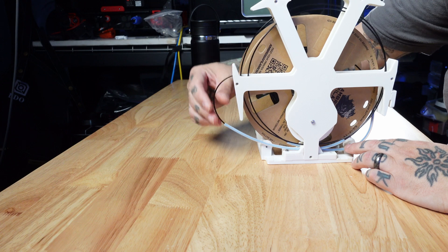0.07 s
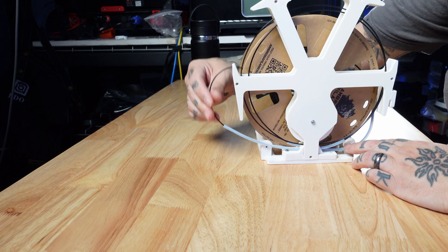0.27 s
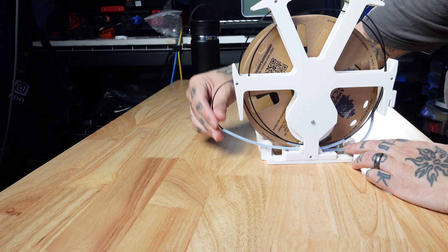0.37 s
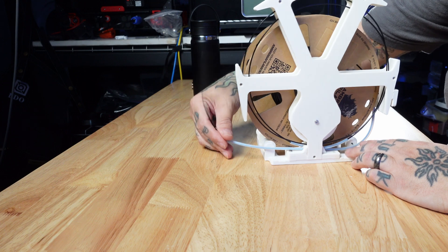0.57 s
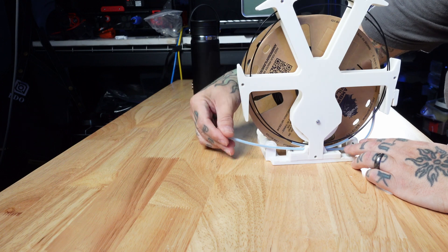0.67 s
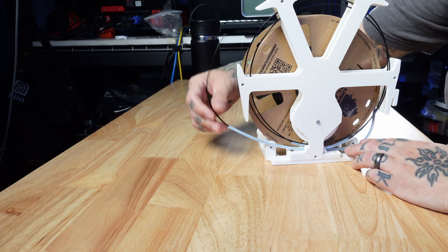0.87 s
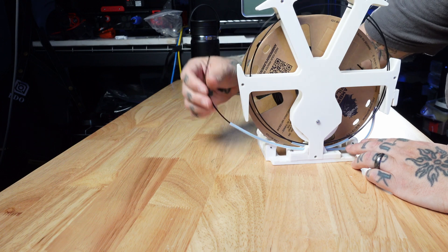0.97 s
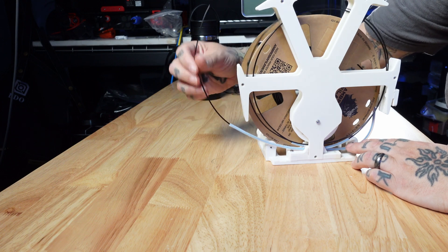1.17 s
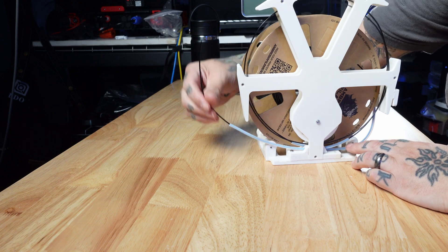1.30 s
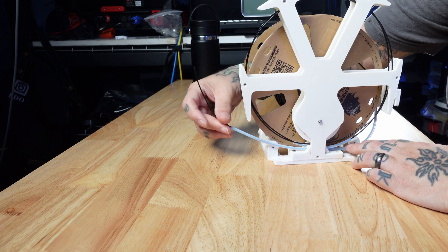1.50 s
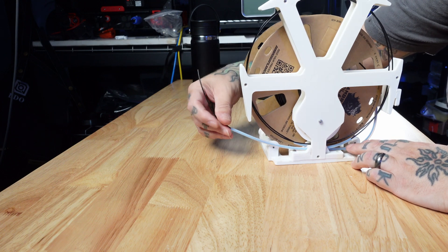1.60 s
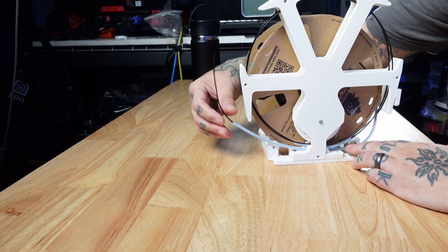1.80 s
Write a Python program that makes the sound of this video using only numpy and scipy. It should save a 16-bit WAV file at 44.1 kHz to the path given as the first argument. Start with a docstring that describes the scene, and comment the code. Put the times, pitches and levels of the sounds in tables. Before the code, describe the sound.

Close, raspy zips of stiff filament sliding in a tube, with a quick snap, tiny ticks and two soft low hums from the holder, fading to near silence over faint room rumble.

```python
"""In a quiet workshop, plastic filament is pushed by hand through a tube on a holder on a wooden bench.
Strokes of dense, tiny slips ring the tube and holder, with broad rubbing noise and treble fizz.
Snags make short bright noise bursts, a click adds a crack and dying tones, and small taps ring.
The holder hums low twice, as three gliding or steady tones over a dull rattle.
The nearby sounds get a short noise tail; steady filtered noise is the workshop rumble."""
import sys
import numpy as np
from scipy import signal
from scipy.fft import rfft, irfft
from scipy.io import wavfile
from scipy.ndimage import uniform_filter1d

SR = 44100
rng = np.random.default_rng(int(sys.argv[2]) if len(sys.argv) > 2 else 0)


def transcribe(signal):
    """Save signal, clipped to [-1, 1], as a 16-bit WAV file at the path in sys.argv[1]."""
    frames = np.atleast_2d(signal).T
    limited = np.clip(frames, -1, 1)
    pcm = np.round(limited * 32767).astype(np.int16)
    wavfile.write(sys.argv[1], SR, pcm)


N = 81585  # length in samples

# Ringing tones of the tube: f/Hz, width/Hz, relative level/dB
TUBE_MODES = [(1908, 84, 3.5), (2177.5, 90, 10.5), (2349, 11.7, 2), (3079, 65, 6.5), (3243, 12, 1.5),
              (3493, 11, -2), (3400, 35, -28), (4034, 52, 4), (4480, 18, -11), (4747, 47, 4)]
# Higher ringing tones of the tube: f/Hz, width/Hz, relative level/dB
HIGH_TUBE_MODES = [(6260, 21, -5.5), (6660, 59, -10.5), (7120, 32, -1.5), (7580, 60, -3.5), (8010, 18, -2),
                   (9140, 32, -9.5)]


def slips():
    """Tiny sticks and releases make a dense random train of impulses, uneven in size and sign."""
    slips_per_s, spread_db, flutter_db = 5000, 3, 1.5
    unevenness = np.minimum(rng.exponential(1, N), 5)
    size = amp(spread_db * unevenness) * rng.choice([-1., 1.], N)
    happens = rng.random(N) < slips_per_s / SR
    return size * happens * amp(flutter_db * slow_noise(300))


def slide():
    """Slips ring the tube, rub broadly, fizz in the treble and ring the holder lower down."""
    # Hand strokes: t/s, slide level/dB, treble relative to it/dB, low ring relative to it/dB
    strokes = [
        [(0.0, -48, -7, 8), (0.008, -49.5, -11.5, -19), (0.03, -43.5, -7, -8.5), (0.04, -44, -16, -13),
         (0.094, -58, -15, -7), (0.118, -54, -18, -2), (0.146, -43.5, -6, -8.5), (0.202, -47, -8, -13),
         (0.216, -60, -13, 6), (0.228, -62, -7, -17)],
        [(0.258, -38, -8, -13), (0.27, -46.5, -24, -16), (0.278, -45, -16.5, -13), (0.336, -41.5, -3.5, -11.5),
         (0.358, -42.5, -7, -7.5), (0.434, -47, -4.5, -4.5), (0.482, -36, -11, -9.5), (0.492, -40.5, -9, -6.5),
         (0.512, -56, -17, -0.5), (0.53, -45, -3, -5)],
        [(0.556, -48, -10, -6), (0.584, -62, 3, 11), (0.622, -53.5, -0.5, 1.5), (0.628, -59, -5, 4),
         (0.64, -58, -4, 3), (0.7, -76.5, -9, 1)],
        [(0.78, -75.5, -7, 14), (0.796, -64, -8, -12), (0.814, -64.5, -14, 8), (0.822, -55, -15, -2.5),
         (0.84, -63.5, -13, 1), (0.85, -68, -22, -8), (0.876, -103, -6, 2), (0.9, -95, -4, 11)],
        [(0.992, -67, -8, -11), (1.004, -47, -3.5, -4), (1.024, -43, -2.5, -6.5), (1.072, -37, -12, -15),
         (1.082, -37, -4, -12.5), (1.128, -42.5, -11, -7), (1.184, -49.5, -16, -9.5), (1.19, -64, 0, -3)],
        [(1.196, -44, -8, -6.5), (1.232, -39.5, -7, -17.5), (1.266, -39.5, -5.5, -8), (1.292, -33, -0.5, -7.5),
         (1.37, -37, -6, -13.5), (1.38, -45, 7, 1), (1.426, -37.5, -10, -9.5), (1.448, -49.5, -3, 0.5),
         (1.612, -78, 6, -6), (1.62, -90, 12, 20), (1.64, -73.5, -4, -3)],
        [(1.735, -89, -7, 7), (1.747, -66.5, -9, -17), (1.767, -65, -6, -11), (1.783, -94, -5, -3),
         (1.803, -87, -4, 13), (1.807, -70, -15, -2), (1.817, -74.5, -16, 12), (1.829, -63, -23, -7),
         (1.839, -69, -13, 4), (1.85, -63, -13, -7)],
    ]
    # Low ringing tones of the holder: f/Hz, width/Hz, relative level/dB
    low_modes = [(972, 41, -2), (1031.6, 31, -1), (1136.5, 49, 1.5), (1192, 13.3, 0), (1290, 42.3, 2)]
    # Tone colour of the broad rubbing: f/Hz, relative level/dB
    rub_colour = [(300, -52), (800, -15), (1500, 1), (2300, 1), (2750, 3.5), (3400, 2), (4500, 1.5),
                  (6000, -19.5)]
    # Tone colour of the treble fizz: f/Hz, relative level/dB
    fizz_colour = [(3240, 3), (5500, -4.5), (6880, -0.5), (9240, -9.5), (9660, -9), (13000, -12),
                   (14500, -22), (16000, -30)]
    ring_db, rub_db, high_ring_db = -4.5, -5.5, -9.5

    first, second = evened(slips()), evened(slips())
    level = amp(along(strokes, 1))
    tube = amp(ring_db) * ring(level * first, TUBE_MODES)
    rub = amp(rub_db) * level * coloured(first, rub_colour)
    treble = level * amp(along(strokes, 2))
    fizz = treble * coloured(first + second, fizz_colour)
    high_ring = amp(high_ring_db) * ring(treble * second, HIGH_TUBE_MODES)
    low_level = level * amp(along(strokes, 3))
    return tube + rub + fizz + high_ring + ring(low_level * second, low_modes)


def catches():
    """Short bright scrapes where the filament snags and lets go: noise bursts around one pitch each."""
    # Snags: t/s, level before halving/dB, fade length/s, centre f/Hz
    snag_table = [(0.406, -33.5, 0.0043, 7400), (0.5416, -28, 0.0026, 8900), (0.5448, -27, 0.0022, 5740),
                  (0.627, -38, 0.0052, 3900), (0.82, -61, 0.0083, 4000), (.912, -58, 0.005, 3900),
                  (1.039, -39.5, 0.013, 4700), (1.083, -25, 0.0042, 5560), (1.1, -44, .005, 8000),
                  (1.202, -41, 0.0069, 6040), (1.2798, -22, 0.0042, 7500), (1.2867, -23, 0.0077, 7260),
                  (1.296, -25, 0.006, 5900), (1.312, -24.5, 0.0085, 4560), (1.3442, -22.5, .004, 6000),
                  (1.394, -35, .006, 9000), (1.4214, -30, 0.011, 5700), (1.816, -68.5, 0.039, 4900)]
    rise_s, spread_octaves = .0006, 0.61
    out = np.zeros(N)
    t = np.arange(2048) / SR
    freqs = np.fft.rfftfreq(2048, 1 / SR) + 1
    for s, db, length, centre_hz in snag_table:
        octaves_away = np.log2(freqs / centre_hz)
        band = np.exp(-.5 * (octaves_away / spread_octaves) ** 2)
        scrape = evened(irfft(rfft(rng.standard_normal(2048)) * band))
        envelope = np.minimum(t / rise_s, 1) * np.exp(-(t / length) ** 2)
        add(out, s, .5 * amp(db) * envelope * scrape)
    return out


def catch_ring(snags):
    """The snags shake the tube, which answers at all its ringing tones."""
    return amp(-6) * ring(snags, TUBE_MODES + HIGH_TUBE_MODES)


def click():
    """A plastic snap in two quick steps: a brief noise crack and quickly dying tones."""
    # Tone colour of the crack: f/Hz, relative level/dB
    crack_colour = [(410, -60), (700, -20.5), (1520, -2), (3160, -21.5), (3840, -3), (5060, -17),
                    (6480, -10), (10100, -26.5), (14000, -26), (16000, -38)]
    # Tones of one snap: f/Hz, starting level/dB, time to fall 60 dB/s
    click_modes = [(1220, -35, 0.066), (1330, -29.5, 0.016), (1393, -34.5, 0.069), (1490, -28.5, 0.035),
                   (1603, -34, 0.049), (1840, -37, 0.05), (2330, -31.5, 0.18), (2397, -33, 0.092),
                   (2070, -35, .012), (2250, -44, 0.27), (2780, -27.5, 0.013), (3280, -38, 0.0097),
                   (4540, -26.5, 0.018), (3690, -30, 0.018), (5280, -31, 0.0095), (6500, -38, 0.0099)]
    click_s, second_snap_s = .2403, .0009  # start time, then delay to the second step
    crack_db, second_snap_db = -22.5, -4.5
    hold_s, crack_t60_s = .0016, .008  # steady time, then time to fall 60 dB
    low_cut_hz = 1000

    out, t = np.zeros(N), np.arange(6000) / SR
    crack_level = amp(crack_db - 60 * np.maximum(t - hold_s, 0) / crack_t60_s)
    crack = crack_level * coloured(rng.standard_normal(6000), crack_colour)
    tones = sum(dying_tone(t, *mode) for mode in click_modes)
    add(out, click_s, crack + tones)
    add(out, click_s + second_snap_s, -amp(second_snap_db) * tones)  # opposite direction
    return signal.sosfilt(signal.butter(12, low_cut_hz, "high", fs=SR, output="sos"), out)


def taps():
    """Small contacts, each ringing a single dying tone."""
    # Taps: t/s, level before the soft start/dB, f/Hz, time to fall 60 dB/s
    tap_table = [(.5415, -41.5, 1138, 0.072), (0.719, -45, 1127, 0.049), (1.004, -43, 2166, 0.056),
                 (1.201, -42, 2143, .05), (1.286, -26.5, 2174, .06), (1.313, -34, 3170, 0.043),
                 (1.346, -28, 3175, 0.059), (1.526, -47, 1510, 0.027), (1.564, -51, 1146, 0.038)]
    out, t = np.zeros(N), np.arange(6000) / SR
    soft_start = np.minimum(t / 0.0015, 1)
    for s, db, hz, t60 in tap_table:
        add(out, s, soft_start * dying_tone(t, hz, db, t60))
    return out


def hum():
    """Three low tones of the holder swell and die over a dull rattle that partly follows the lowest."""
    # Two hums: t/s, lowest tone's level/dB, its f/Hz, second tone's level/dB, third tone's level/dB
    hum_tables = [
        [(.53, -68, 207.2, -67, -86), (.545, -39, 205, -62, -48.5), (.565, -38.5, 202.5, -41.5, -45.5),
         (.587, -22.5, 204.8, -57, -77), (.61, -27.5, 199.6, -49, -54), (.635, -34, 202, -48, -53),
         (.655, -53, 203, -42.5, -70), (.68, -45, 199, -57, -77), (.712, -44.5, 206, -69, -71),
         (.77, -62.5, 209, -67, -80), (.8, -58, 202.6, -71, -77)],
        [(1.46, -81, 205, -72, -65), (1.472, -39.5, 210, -57, -57.5), (1.48, -38.5, 202, -65, -56),
         (1.5, -51.5, 198, -66, -74), (1.52, -46, 191, -63, -75), (1.545, -61, 192, -71, -82),
         (1.56, -66, 191, -75, -78)],
    ]
    # Tone colour of the dull rattle: f/Hz, relative level/dB
    rattle_colour = [(240, 2), (450, -7.5), (750, -8.5)]
    second_hz, third_hz = 346, 408
    rattle_db, rattle_follows = -38, .5  # rattle moves .5 dB for each dB of the lowest tone

    t, out = np.arange(N) / SR, np.zeros(N)
    rattle = coloured(rng.standard_normal(N), rattle_colour)
    for table in hum_tables:
        s, db, hz, second_db, third_db = np.transpose(table)
        on = uniform_filter1d(1. * (t > s[0]) * (t < s[-1]), size=400)  # softened on and off
        rattle_level = amp(rattle_db + rattle_follows * np.interp(t, s, db))
        out += on * rattle_level * rattle
        gliding_hz = np.interp(t, s, hz)
        for level_db, pitch in ((db, gliding_hz), (second_db, second_hz), (third_db, third_hz)):
            cycles = np.cumsum(pitch + 0 * t) / SR + rng.random()
            tone = np.sqrt(2) * np.sin(2 * np.pi * cycles)  # rms 1
            out += on * amp(np.interp(t, s, level_db)) * tone
    return out


def room(x):
    """Many mixed reflections act like a short, softened, fading noise tail."""
    tail_db, t60_s, delay_s = -16.5, 0.4, .006
    t = np.arange(SR // 2) / SR
    tail = rng.standard_normal(len(t)) * amp(-60 * t / t60_s) * (t > delay_s)
    tail = signal.lfilter([.5], [1, -.5], tail)  # softens the treble
    return amp(tail_db) * signal.fftconvolve(x, tail / np.linalg.norm(tail))[:N]


def workshop():
    """The quiet rumble behind is steady random noise, strongest in the bass."""
    # Tone colour of the rumble: f/Hz, relative level/dB
    shop_colour = [(15, 2.5), (40, -4), (70, -7.5), (86, -11.5), (123, -9.5), (164, -16.5), (200, -14),
                   (250, -26.5), (330, -25.5), (575, -27), (840, -29), (1130, -31), (1600, -37.5),
                   (5000, -47), (16000, -53.5)]
    return amp(-49) * coloured(rng.standard_normal(N), shop_colour)


def amp(db):
    """Turns decibels into a plain multiplier."""
    return 10 ** (np.asarray(db) / 20)


def evened(x):
    """Scales a sound to an rms (average strength) of 1."""
    return x / np.sqrt(np.mean(x ** 2) + 1e-20)


def slow_noise(size):
    """Smooths noise twice into a slow random curve of rms 1; a larger size is slower."""
    once = uniform_filter1d(rng.standard_normal(N), size=size)
    return evened(uniform_filter1d(once, size=size))


def along(tables, column):
    """Draws straight lines between one column's values, sample by sample."""
    rows = np.vstack(tables)
    return np.interp(np.arange(N) / SR, rows[:, 0], rows[:, column])


def coloured(x, points, edge_db=-40):
    """Filters x by a table of f/Hz, level/dB, falling edge_db per octave outside its ends; rms 1."""
    f, db = np.transpose(points)
    hz = np.fft.rfftfreq(len(x), 1 / SR) + 1  # +1 avoids log(0)
    octaves_outside = np.maximum(np.log2(f[0] / hz), 0) + np.maximum(np.log2(hz / f[-1]), 0)
    gain_db = np.interp(np.log(hz), np.log(f), db) + edge_db * octaves_outside
    return evened(irfft(rfft(x) * amp(gain_db), len(x)))


def dying_tone(t, hz, db, t60):
    """A struck part rings at one pitch, losing 60 dB in t60 seconds."""
    return amp(db - 60 * t / t60) * np.sin(2 * np.pi * hz * t)


def resonate(hz, width):
    """One mode's answer to an impulse: wider modes die faster, but peak gain does not depend on width."""
    t = np.arange(4096) / SR
    return width * np.exp(-np.pi * width * t) * np.sin(2 * np.pi * hz * t)


def ring(x, modes):
    """Rings a set of modes; each swells on its own as the contact point moves."""
    wander_db = 2.5
    # Signs alternate from mode to mode
    answers = [(-1) ** k * amp(db) * resonate(hz, width) for k, (hz, width, db) in enumerate(modes)]
    total = np.zeros(N)
    for answer in answers:
        share = x * amp(wander_db * slow_noise(1500))
        total += signal.oaconvolve(share, answer)[:N]
    return total / np.linalg.norm(answers)  # white noise roughly keeps its level


def add(mix, s, sound):
    """Adds a sound to the mix from s seconds on, cut at the end."""
    part = mix[round(s * SR):][:len(sound)]
    part += sound[:len(part)]


def scene():
    """Mixes the nearby sounds with their room tail, the hum and the workshop rumble."""
    snags = catches()
    near = slide() + snags + catch_ring(snags) + click() + taps()
    return (near + room(near) + hum() + workshop())[None]


def record(dry):
    """Removes the treble above the band limit."""
    edge_hz = 15800
    low_pass = signal.firwin(511, edge_hz, window=("kaiser", 9), fs=SR)
    return signal.oaconvolve(dry, low_pass[None], "same")


dry = scene()
out = record(dry)
transcribe(out)
```